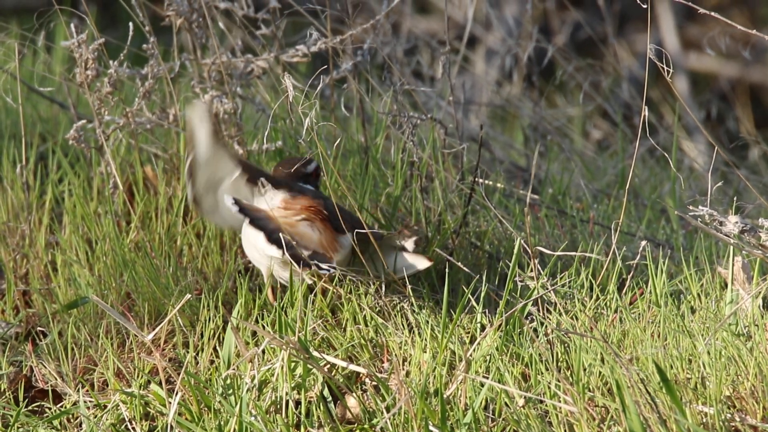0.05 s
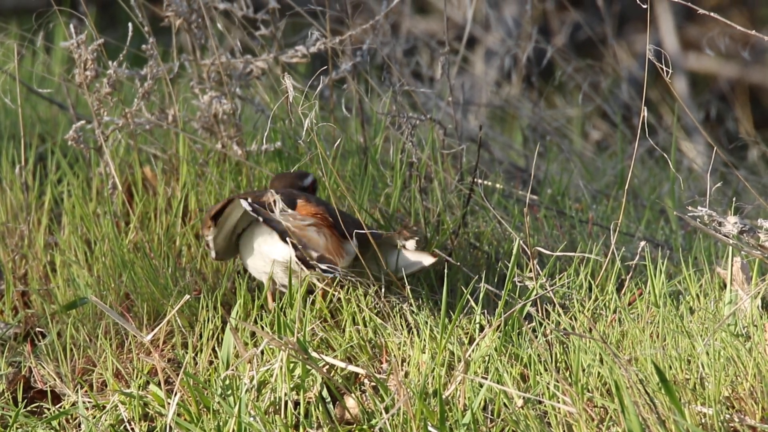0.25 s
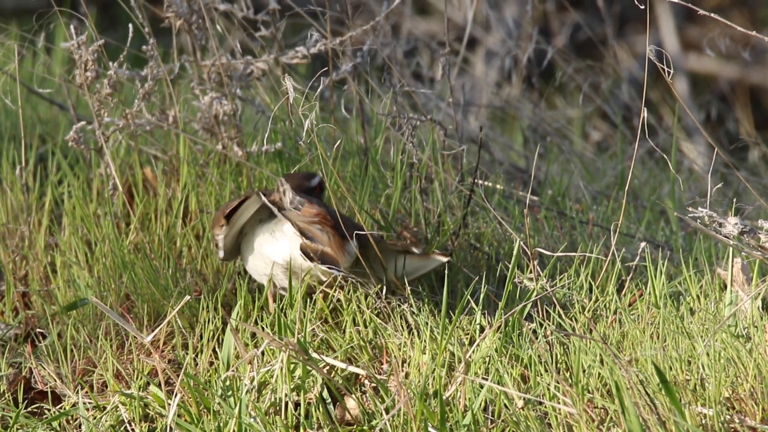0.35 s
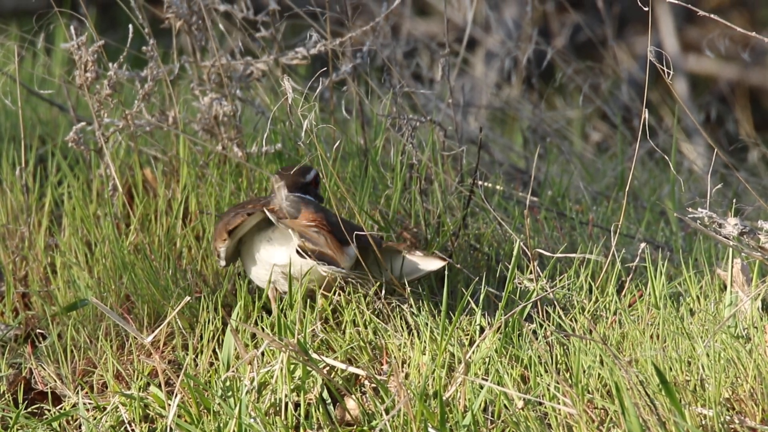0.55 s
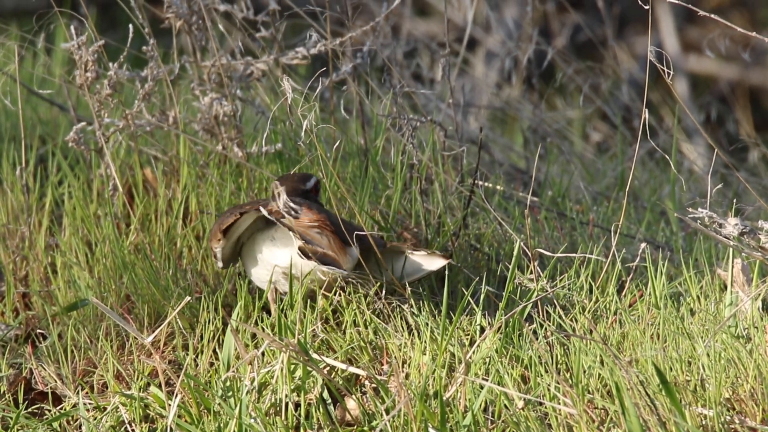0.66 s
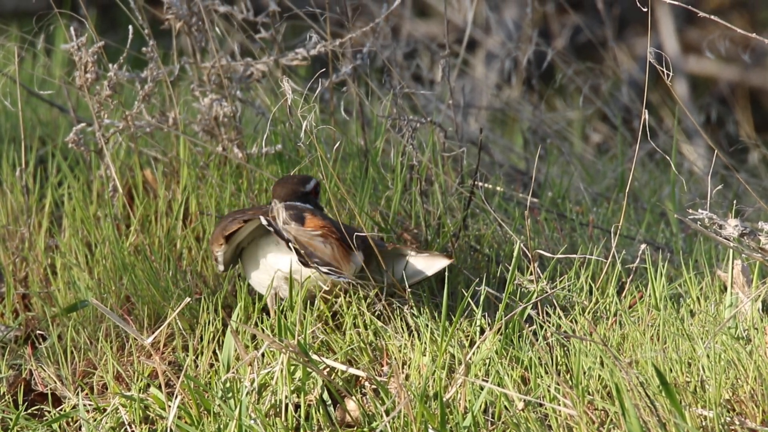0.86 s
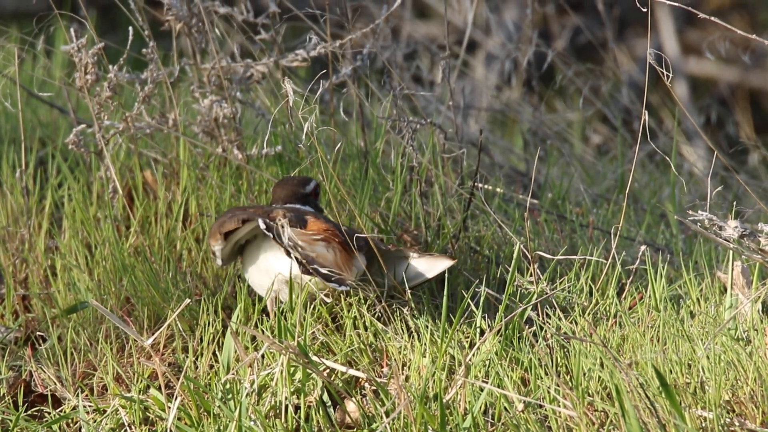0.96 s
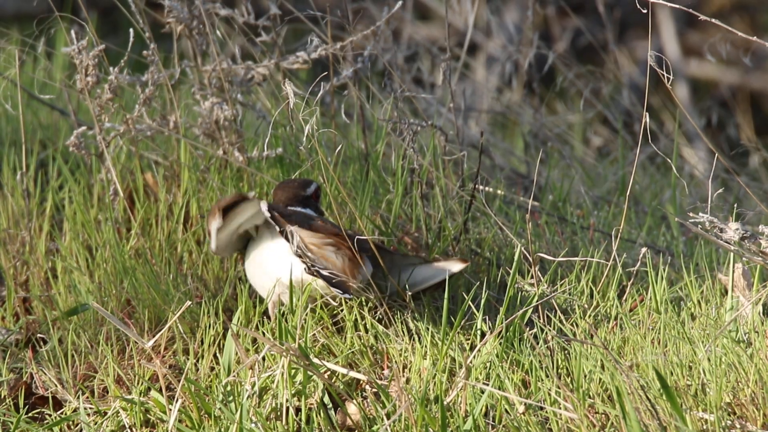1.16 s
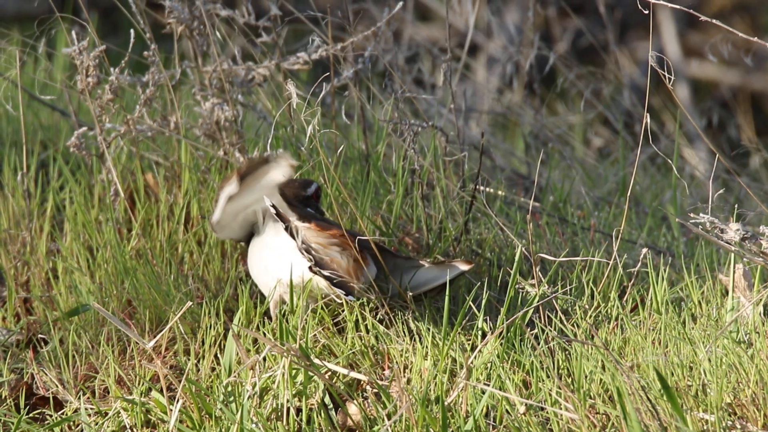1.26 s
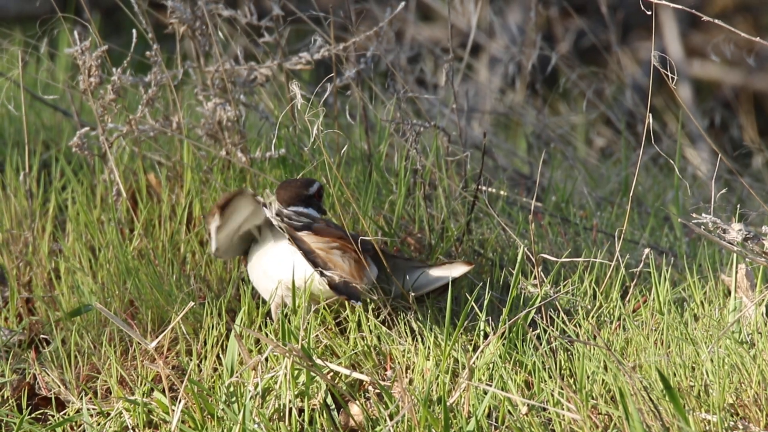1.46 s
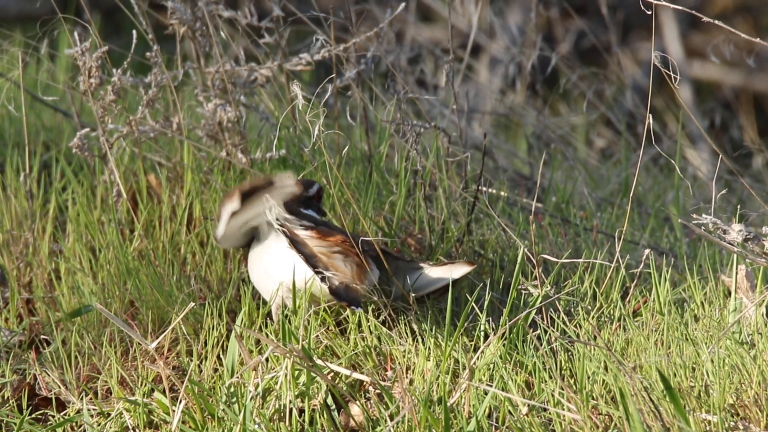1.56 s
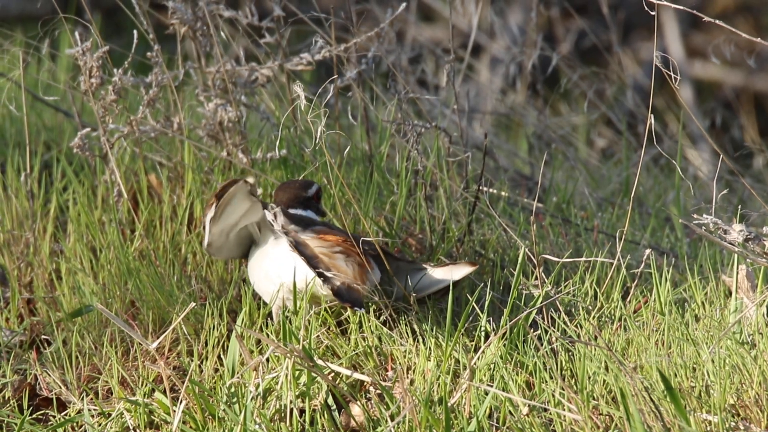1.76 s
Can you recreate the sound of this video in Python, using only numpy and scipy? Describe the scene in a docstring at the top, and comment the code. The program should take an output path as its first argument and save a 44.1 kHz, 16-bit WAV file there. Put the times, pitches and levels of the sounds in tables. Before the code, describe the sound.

In open grassy ground, evenly spaced harsh honks stand out close to the microphone; thin high whistles alternate with them, faint hoarse honks and songbirds sound far away, and one dry tick snaps midway.

```python
"""Goose-like honks over open grassland

A bird honks four times: each honk starts as a rasp, rattles, then locks into a clean nasal note that droops.
A small bird repeats a thin whistle; fainter honks and songbirds carry from far off.
There is one dry tick, over a low distant rumble. Calls are moving sines and coloured noise."""
import sys
import numpy as np
from scipy import signal
from scipy.fft import rfft, irfft
from scipy.io import wavfile
from scipy.ndimage import uniform_filter1d

SR = 44100
rng = np.random.default_rng(int(sys.argv[2]) if len(sys.argv) > 2 else 0)


def to_wav(sig):
    """Store sig (one row per channel, or 1-D mono) as 16-bit WAV at the path in sys.argv[1].

    Samples outside -1..1 are clipped; the rate is SR.
    """
    pcm = np.clip(np.atleast_2d(sig), -1, 1) * 32767
    pcm = np.round(pcm).astype(np.int16)
    wavfile.write(sys.argv[1], SR, pcm.T)  # frames by channels


N = 79380
T = np.arange(N) / SR


def undb(db):
    """Decibels to gain."""
    return 10 ** (np.asarray(db) / 20)


def colour(x, points):
    """Shape a sound by (frequency [Hz], level [dB]) points; the result has rms 1."""
    hz, db = np.array(points, float).T
    f = np.maximum(np.arange(N // 2 + 1) * SR / N, 1)
    gain = undb(np.interp(np.log(f), np.log(hz), db))
    y = irfft(rfft(x) * gain, N)
    return y / y.std()


def noise(points):
    """Coloured noise of rms 1."""
    return colour(rng.standard_normal(N), points)


def walk(rate):
    """Smooth chance with a spread of 1: noise averaged twice over 1 / rate seconds."""
    k = max(int(SR / rate), 1)
    y = uniform_filter1d(rng.standard_normal(N), k, mode="wrap")
    y = uniform_filter1d(y, k, mode="wrap")
    return y / y.std()


def ramp(start, length):
    """Smooth rise from 0 to 1."""
    return np.sin(np.pi / 2 * np.clip((T - start) / length, 0, 1)) ** 2


def gate(start, length, edge):
    """Attack, hold and release."""
    return ramp(start, edge) * (1 - ramp(start + length - edge, edge))


def tone(hz, multiple=1):
    """Sine of rms 1 on a multiple of a moving pitch."""
    return np.sqrt(2) * np.sin(2 * np.pi * multiple * np.cumsum(hz) / SR)


def field():
    """Distant rumble and hiss as coloured noise, with a wavering low drone."""
    # background spectrum: (frequency [Hz], relative density [dB])
    field_colour = [(20, -35), (40, -14), (62, -4), (95, -1), (113, 3), (135, -3), (200, -8.5), (300, -11),
                    (390, -6), (430, -10.5), (490, -6), (600, -11), (900, -9), (1150, -8), (1320, -9.5),
                    (1520, -17.5), (2000, -17.5), (2600, -23.5), (3100, -25.5), (4000, -24), (4900, -32),
                    (8000, -31), (15500, -36.5)]
    air = noise(field_colour) * undb(-48.5 + 1.4 * walk(9))
    drone_hz = 114.1 * (1 + 0.0504 * walk(18.5))
    return air + tone(drone_hz) * undb(-61 + 4.9 * walk(6.2))


def whistles():
    """A pure thin note that steps down, holds and lifts at its end."""
    # the small bird's notes: (start [s], length [s], level [dB])
    whistle_notes = [(-.026, 0.16, -54), (0.516, 0.14, -53.5), (1.055, 0.1545, -54.5), (1.657, .165, -54.5)]
    # pitch path of every note: (share of its length [0-1], pitch [Hz])
    whistle_path = [(0, 4500), (.1, 4575), (0.291, 4291), (.6, 4274), (.85, 4240), (1, 4320)]
    edge_s, jitter_share = 0.0048, 0.0012
    share, hz = np.array(whistle_path).T
    out = 0
    for start, length, db in whistle_notes:
        level = undb(db) * gate(start, length, edge_s) * undb(1.4 * walk(60.6))
        path = np.interp((T - start) / length, share, hz)
        out = out + level * tone(path * (1 + jitter_share * walk(220)))
    return out


def echo(x):
    """Weak, long scatter from the surrounding brush: a decaying noise tail smears each call."""
    # colour of the scatter: (frequency [Hz], level [dB])
    echo_colour = [(400, -17), (1300, 0.5), (2000, -11), (3000, -2), (4000, -7.5), (5000, 11), (9000, -21)]
    echo_db, t60_s, build_up_s = -26.5, 2.0, .04
    tail = noise(echo_colour) * ramp(0, build_up_s) * np.exp(-np.log(1000) * T / t60_s)
    tail = tail / np.sqrt(np.sum(tail ** 2))
    return undb(echo_db) * signal.fftconvolve(x, tail)[:N]


def far_honks():
    """Distant hoarse calls, of which only the strongest partial carries."""
    # (start [s], length [s], pitch [Hz], tone level [dB], hoarse noise level [dB])
    far_calls = [(0.043, 0.064, 1378, -53.5, -52.5), (0.441, .045, 1367, -50.5, -50.5),
                 (0.474, 0.078, 1242, -50.5, -47), (0.521, 0.052, 949, -43, -44),
                 (0.584, 0.058, 985, -43.5, -55), (0.863, 0.034, 1435, -55, -75),
                 (0.913, 0.047, 1330, -45.5, -51.5), (0.967, 0.086, 971, -47.5, -49),
                 (1.244, 0.039, 1426, -52.5, -53), (1.335, 0.057, 1060, -49.5, -59),
                 (1.55, 0.055, 962, -49, -56.5), (1.6, 0.081, 1276, -57, -49),
                 (1.627, 0.049, 960.5, -43, -68)]
    # colour of the hoarseness: (frequency [Hz], level [dB])
    hoarse_colour = [(400, -37), (800, -3), (1000, -4.5), (1300, 3.5), (1550, -18), (3000, -39)]
    droop_share, jitter_share, edge_s = 0.059, 0.0138, 0.013
    out = 0
    for start, length, hz, db, hoarse_db in far_calls:
        droop = droop_share * np.clip((T - start) / length, 0, 1) ** 3
        pitch = hz * (1 - droop + jitter_share * walk(297))
        call = undb(db) * tone(pitch) + undb(hoarse_db) * noise(hoarse_colour)
        out = out + gate(start, length, edge_s) * call
    return out


def songbirds():
    """Faint gliding notes, some pure and some buzzy from a fast pitch waver."""
    # (start [s], length [s], first pitch [Hz], middle pitch [Hz], last pitch [Hz],
    #  level [dB], waver [share of pitch])
    song_notes = [(.17, 0.15, 3960, 3936, 3790, -62.5, 0.0024),
                  (.92, 0.194, 3840, 3880, 3970, -67.5, 0.0015),
                  (1.242, .15, 4480, 4230, 3850, -63, 0.0077), (1.32, .25, 4130, 4126, 4080, -62, 0.0105),
                  (1.32, .22, 3953, 3780, 3665, -56, .03), (1.565, 0.1, 2250, 2770, 2180, -63, 0.0054)]
    edge_s, flicker_db = 0.038, 2.5
    out = 0
    for start, length, first, middle, last, db, waver in song_notes:
        curve = np.polyfit([0, .5, 1], [first, middle, last], 2)
        arch = np.polyval(curve, np.clip((T - start) / length, 0, 1))
        pitch = arch * (1 + waver * walk(500))
        level = undb(db + flicker_db * walk(66))
        out = out + level * gate(start, length, edge_s) * tone(pitch)
    return out


def flutter(hz, scatter, decay):
    """Uneven pulsing of the membranes: each cycle opens quickly and dies away."""
    phase = np.cumsum(hz * (1 + scatter * walk(hz))) / SR % 1
    y = uniform_filter1d(np.exp(-phase / decay), size=30)
    return y / y.max()


def honk(rasp_s, rattle_s, clean_s, end_s, hz, glide, db, rasp_db, rattle_db, depth, bright_db):
    """Noisy pulses give way to a rattling tone, then to a clean note that sags as it fades."""
    # harmonics of the note: (multiple of the pitch, level [dB])
    harmonics = [(1, -17), (2, 0), (3, -2), (4, -21), (5, -29), (6, -26.5), (7, -34), (8, -40), (9, -42),
                 (10, -55), (11, -40.5), (12, -41), (13, -67)]
    # throat colour of rasp and grit: (frequency [Hz], level [dB])
    throat = [(300, -25), (650, -13.5), (900, -6.5), (1170, 6.5), (1330, 6.5), (1520, -4), (1950, 0),
              (2500, -11), (3000, -19.5), (3900, -23.5), (5000, -28), (7700, -43), (9500, -35),
              (15000, -56)]
    # colour of the air that rides on the voiced part: (frequency [Hz], level [dB])
    air_colour = [(300, -21), (700, -17), (1100, -3), (1600, -6.5), (2000, 1.5), (2500, 1.5), (3100, -7.5),
                  (3900, -11.5), (5000, -28), (6200, -19), (7700, -28), (9500, -43), (15000, -51)]
    lock_s, swell_s, release_s, overtone_stop_s = 0.0065, 0.0075, 0.04, 0.012
    droop_s, droop_share, jitter_share, rattle_jitter_share = .042, 0.13, 0.0018, .01

    rough = 1 - ramp(clean_s - lock_s, 2 * lock_s)
    voiced = ramp(rattle_s - swell_s / 2, swell_s)
    fade = np.clip((T - end_s + release_s) / (release_s + 0.0053), 0, 1)
    release = np.cos(np.pi / 2 * fade) ** 1.5
    # only the strongest harmonic lasts to the end
    early_release = release ** 1.22 * (1 - ramp(end_s - overtone_stop_s, overtone_stop_s))

    # the glide reaches the given pitch where the droop begins
    sagging = T - end_s + droop_s
    droop = droop_share * np.clip(sagging / droop_s, 0, 2) ** 2
    jitter = jitter_share * walk(196) + rattle_jitter_share * rough * walk(495)
    pitch = (hz + glide * np.minimum(sagging, 0)) * (1 - droop + jitter)
    rattle = flutter(156.6, 0.0492, 0.33)
    pitch = pitch * (1 - 0.21 * rough * (rattle - rattle.mean()))  # each pulse drags the pitch down
    rise = undb(rattle_db * rough - 53 * np.maximum(clean_s - T, 0))  # climbs 53 dB per s

    note = 0
    for k, (_, harmonic_db) in enumerate(harmonics):
        upper = k > 2  # the weak overtones flicker and fray
        flicker_db = upper * (bright_db + 3.5 * walk(37))
        dull_db = (k > 1) * -8 * rough  # the rattle is duller than the clean note
        gain = undb(harmonic_db + flicker_db + dull_db)
        frayed = pitch * (1 + upper * 0.0034 * walk(930))
        note = note + gain * tone(frayed, k + 1) * (release if k == 1 else early_release)
    note = note * undb(db - 1.0) * voiced * rise * (1 - rough * depth * (1 - rattle))

    # breath is strongest as the note locks
    air_level = undb(-42.5 + .25 * bright_db) * np.exp(-np.abs(T - clean_s) / 0.014)
    grit = colour(rng.standard_normal(N) * rattle, throat) * voiced * rough * rise * undb(-38)
    air = colour(rng.standard_normal(N) * rattle, air_colour) * voiced * release * air_level
    rasp = colour(rng.standard_normal(N) * flutter(160.8, .25, 1), throat)
    rasp_level = undb(rasp_db - 32 * np.maximum(T - rasp_s, 0))  # sags 32 dB per s
    rasp = rasp * ramp(rasp_s - swell_s / 2, swell_s) * (1 - voiced) * rasp_level
    return note + air + grit + rasp


def honks():
    """The near bird's calls, each voiced from rasp to clean note."""
    # (rasp start [s], rattle start [s], clean note start [s], end [s], pitch [Hz], glide [Hz per s],
    #  note level before a 1 dB cut [dB], rasp level [dB], rattle relative to the note [dB],
    #  rattle depth [0-1], overtone brightness [dB])
    honk_calls = [(0.178, 0.235, 0.25, 0.34, 656.2, 259.5, -28.5, -44.5, -3, 0.6, 3.5),
                  (0.574, .627, 0.65, 0.72, 652.8, -240, -28.5, -40.5, 0, 0.35, -1.5),
                  (0.999, 1.046, 1.103, 1.141, 657.4, 0.5, -29, -43, 1, 0.72, -3.5),
                  (1.379, 1.431, 1.480, 1.526, 660.2, 0.5, -29, -41.5, 0, 0.61, -0.5)]
    return sum(honk(*row) for row in honk_calls)


def tick():
    """One dry snap, perhaps a stalk: a noise burst that dies within milliseconds."""
    # colour of the snap: (frequency [Hz], level [dB])
    tick_colour = [(150, -13), (450, 5.5), (1000, 6), (1500, -3), (1900, 4), (2400, -18), (3200, -7.5),
                   (5500, -28.5), (7500, -26), (12000, -47)]
    tick_s, tick_db, decay_s = .8938, -30.5, 0.0021
    decay = np.exp(-np.maximum(T - tick_s, 0) / decay_s)
    return undb(tick_db) * noise(tick_colour) * ramp(tick_s - .0005, 0.00042) * decay


def scene():
    """All the birds and their echo over the field, with the tick."""
    birds = honks() + far_honks() + whistles() + songbirds()
    return (birds + echo(birds) + tick() + field())[None]


def record(dry):
    """The recorder cuts the top with a steep low-pass."""
    top_hz = 15700
    return signal.sosfilt(signal.ellip(10, .2, 70, top_hz, fs=SR, output="sos"), dry)


dry = scene()
out = record(dry)
to_wav(out)
```